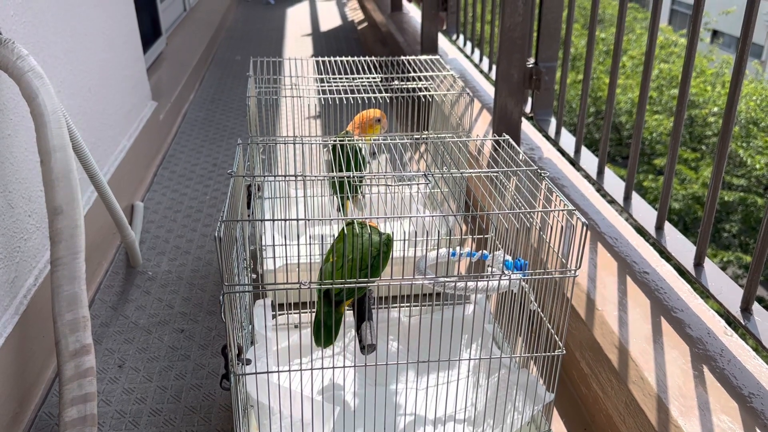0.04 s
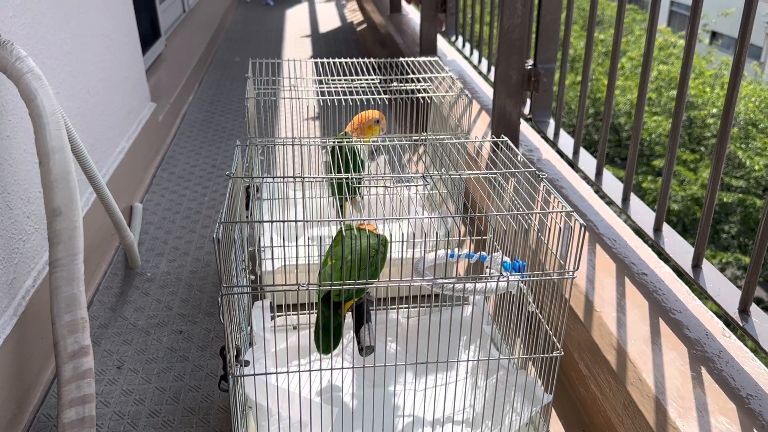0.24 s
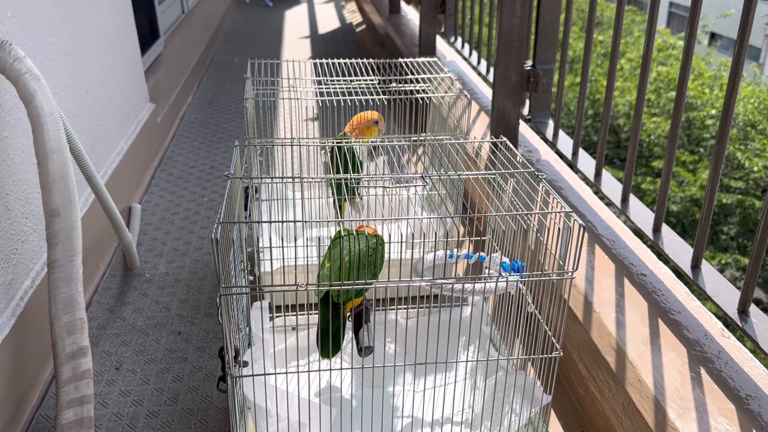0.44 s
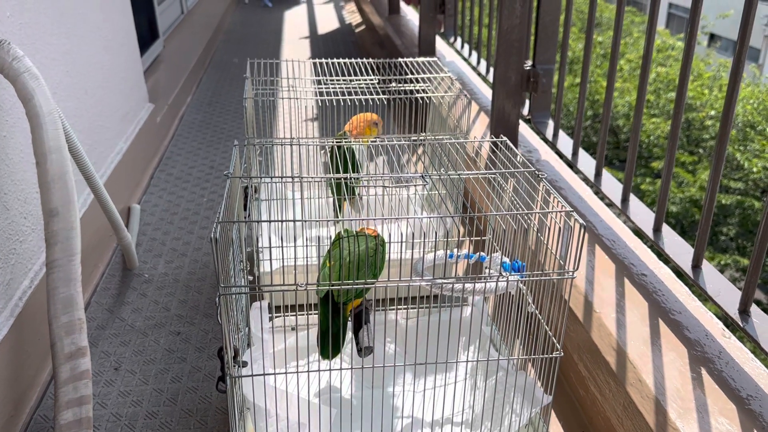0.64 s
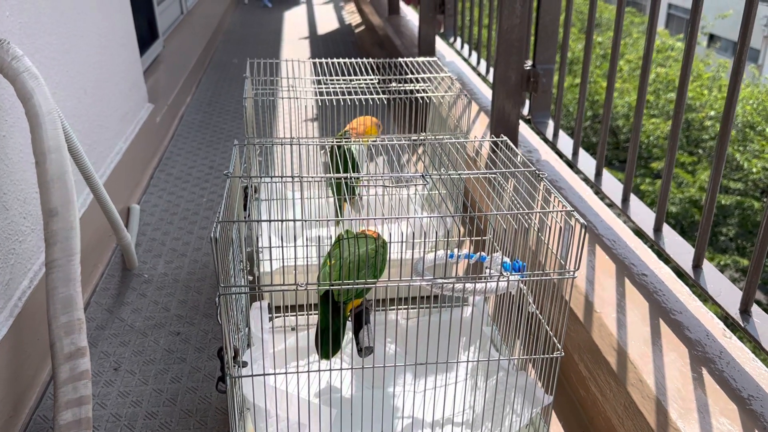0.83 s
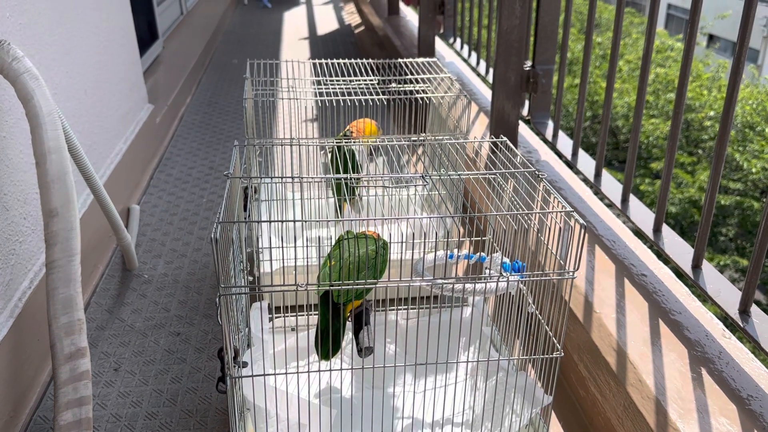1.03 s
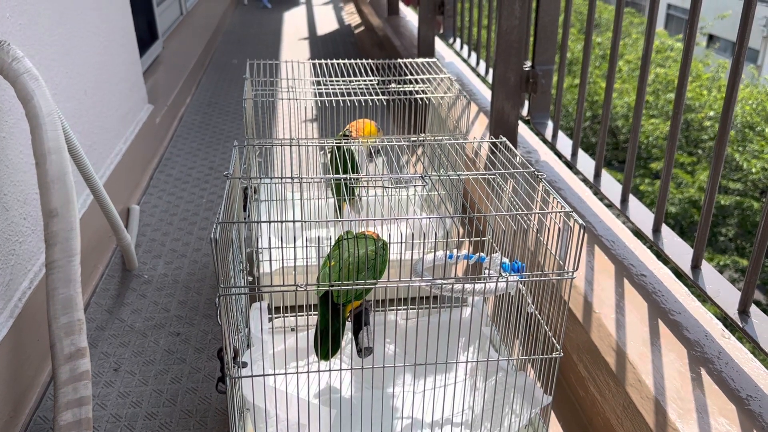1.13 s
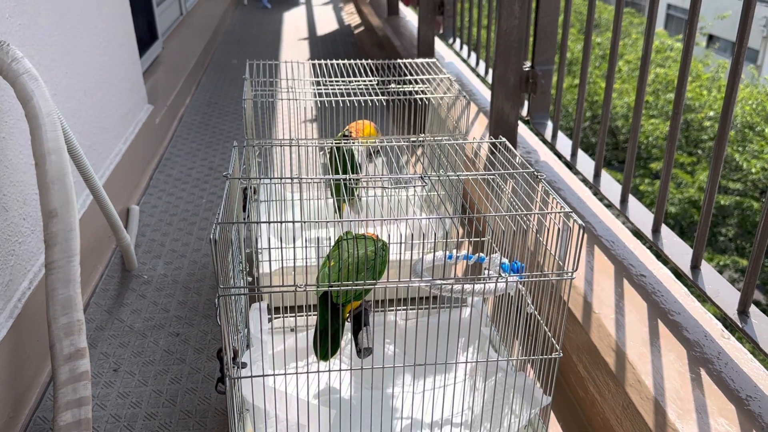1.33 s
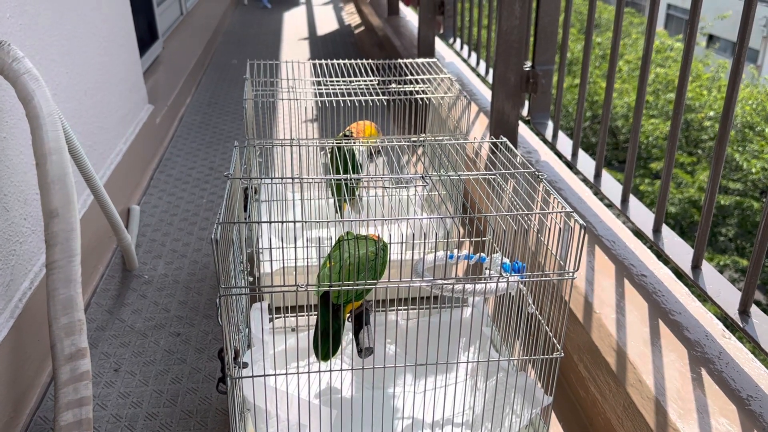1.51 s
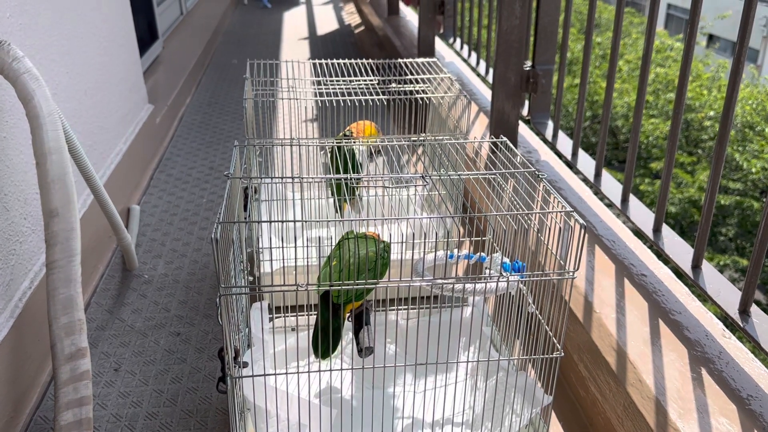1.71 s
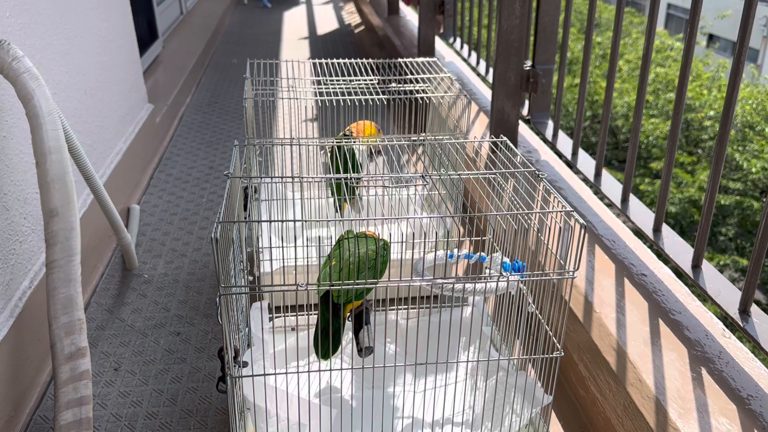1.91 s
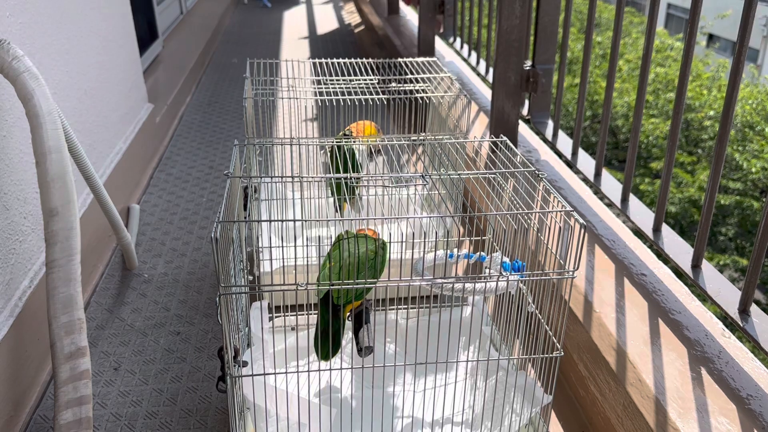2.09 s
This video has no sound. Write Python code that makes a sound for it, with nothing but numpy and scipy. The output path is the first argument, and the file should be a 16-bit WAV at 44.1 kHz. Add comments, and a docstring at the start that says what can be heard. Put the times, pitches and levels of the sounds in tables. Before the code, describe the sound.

A parrot squawks loudly and close by at 0.2 seconds, a harsh fluttering rasp lasting until 0.6. A second squawk at 0.7 clears into a pure whistle that ends around 1 second, echoing lightly off walls and buildings as another bird calls faintly far off. From 1.6 seconds come faint cage ticks, a soft swelling hiss and short distant chirps. A quiet town rumble continues below the balcony throughout.

```python
"""A town rumbles below a balcony, and a cage ticks faintly. At 0.2 s the parrot in it squawks: the
two sides of its syrinx vibrate at different pitches and break into a fluttering rasp, which near walls
and far buildings reflect. A second squawk at 0.7 s clears into a pure whistle, as another bird starts
calling farther off. From 1.6 s come more ticks, a soft swelling hiss and short distant chirps."""
import sys
import numpy as np
from scipy import signal
from scipy.fft import rfft, irfft
from scipy.io import wavfile

SR = 44100
rng = np.random.default_rng(int(sys.argv[2]) if len(sys.argv) > 2 else 0)


def generate_wav(signal):
    """Clip the signal to [-1, 1] and save it as 16-bit WAV at the path in sys.argv[1]."""
    frames = np.transpose(np.atleast_2d(signal))
    scaled = np.clip(frames, -1, 1) * 32767
    pcm = np.round(scaled).astype(np.int16)
    wavfile.write(sys.argv[1], SR, pcm)


N = 94815
T = np.arange(N) / SR
F = np.fft.rfftfreq(N, 1 / SR)

def amp(db):
    """Amplitude ratio from decibels."""
    return 10 ** (np.asarray(db) / 20)

def unit_rms(x):
    """Normalisation to unit power."""
    return x / np.sqrt(np.mean(x ** 2) + 1e-20)

def curve(table, column=1):
    """Linear interpolation over time."""
    rows = np.array(table, float)
    return np.interp(T, rows[:, 0], rows[:, column])

def envelope(table, edge_s=.003):
    """Amplitude envelope, fading to silence outside the table."""
    inside_s = np.minimum(T - table[0][0], table[-1][0] - T)
    return amp(curve(table)) * np.clip(inside_s / edge_s + 1, 0, 1)

def spectrum(table):
    """Interpolation over log frequency."""
    hz, value = np.transpose(table)
    return np.interp(np.log(F + 1), np.log(hz + 1), value)

def colour(x, table):
    """Zero-phase filtering by a gain curve."""
    return irfft(rfft(x) * amp(spectrum(table)), N)

def wander(hz):
    """Low-pass Gaussian noise of unit power."""
    return unit_rms(irfft(rfft(rng.standard_normal(N)) / (1 + (F / hz) ** 4), N))

def noise_band(phase, hz):
    """Random quadrature modulation spreads a tone by about hz to each side."""
    return wander(hz) * np.cos(phase) + wander(hz) * np.sin(phase)

def stereo_noise(table):
    """Partly coherent noise: the channels share half their power."""
    return unit_rms(colour(rng.standard_normal((2, N)) + rng.standard_normal(N), table))

# Rumble spectrum (f/Hz, gain/dB)
TOWN_SPECTRUM = [(15, -48.5), (25, -30.5), (44, -5), (142, -4), (176, -8), (301, -13.5), (383, -13.5),
                 (558, -20), (769, -18), (2700, -38), (3090, -36.5), (3540, -41.5), (7000, -61),
                 (15000, -77.5)]
# Likeness of left and right (f/Hz, correlation)
TOWN_COHERENCE = [(60, 1.0), (180, 0.96), (550, 0.66), (1650, 0.03), (4970, 0.03), (15000, 0.02)]
# Soft low bumps (t/s, f/Hz, level/dB)
BUMPS = [(.65, 57, -39.5), (.81, 68, -41.5)]
def town():
    """Rumble, coherent between the ears at long wavelengths, with two Gaussian tone pulses."""
    common, separate = rfft(rng.standard_normal((2, N)))
    coherence = spectrum(TOWN_COHERENCE)
    right = coherence * common + np.sqrt(1 - coherence ** 2) * separate
    rumble = unit_rms(colour(irfft(np.array([common, right]), N), TOWN_SPECTRUM))
    bumps = sum(amp(db) * np.exp(-((T - s) / .025) ** 2) * np.cos(2 * np.pi * hz * (T - s))
                for s, hz, db in BUMPS)
    return amp(-44.5 + .23 * wander(hz=7.9)) * rumble + np.sqrt(2) * bumps

# Tick onsets (t/s, relative level/dB)
TICKS = [(0.034, -45), (1.631, -61), (1.7641, -53.5), (1.7862, -54.5), (1.91, -69)]
# Tick spectrum (f/Hz, gain/dB)
TICK_SPECTRUM = [(1700, 22), (3000, -10), (4600, 12), (6000, -17), (8300, -9), (12000, -32)]
def cage_ticks(gain_db=8.5, decay_s=.00098):
    """Damped transients: each tick on the cage is noise in exponential decay."""
    decays = sum(amp(db + gain_db) * (T >= s) * np.exp(-abs(T - s) / decay_s) for s, db in TICKS)
    return decays * stereo_noise(TICK_SPECTRUM)

def harmonic(turns, order):
    """One term of a harmonic series; airflow modulates the overtones at random."""
    phase = 2 * np.pi * order * turns
    flicker = .52 if order > 1 else 0
    return np.sqrt(1 - flicker ** 2) * np.sin(phase) + flicker * noise_band(phase, hz=220) / np.sqrt(2)

def syrinx_side(table, roughness, jitter, calm, driven):
    """A vibrating membrane: roughness adds jitter and shimmer and shifts the spectrum to `driven`."""
    pitch_hz = curve(table, 2) * (1 + jitter * roughness * wander(hz=311))
    turns = np.cumsum(pitch_hz) / SR
    drive = np.minimum(2 * roughness, 1)
    wave = sum(amp(calm_db + (driven_db - calm_db) * drive) * harmonic(turns, order)
               for (order, calm_db), (_, driven_db) in zip(calm, driven))
    depth = .34 * roughness
    shimmer = np.exp(depth * np.tanh(wander(hz=428.3)) - depth ** 2 / 2)
    return np.sqrt(2) * wave * envelope(table) * shimmer

# Lower voice in each squawk (t/s, relative level/dB, f/Hz, roughness 0-1)
LOWER_1 = [(.184, -43.5, 1020, 0), (.193, -33.5, 1300, 0.2), (.203, -34.5, 1520, 0.05),
           (.22, -24.5, 1900, 0), (.25, -32.5, 2000, 0.88), (.28, -39, 2560, 0.88), (.3, -24, 2720, 0),
           (.311, -31, 2960, 0.9), (.323, -22.5, 3030, 0.07), (.332, -32.5, 3080, 0.77),
           (.35, -16, 3170, .3), (.37, -33.5, 3230, 0.43), (.4, -39.5, 3220, 0.6), (.42, -28.5, 2481, 1),
           (.445, -35, 2300, 1), (.468, -27.5, 2000, 0.63), (.52, -39, 2377, 1), (.565, -29, 2550, .8),
           (.585, -37.5, 2350, 0.64)]
LOWER_2 = [(0.732, -29, 995, .08), (0.74, -27, 1287, .08), (.744, -21, 1376, .1), (0.75, -27.5, 1636, .15),
           (.753, -28, 1788, .2), (.757, -22.5, 2262, .2), (.768, -19, 2478, .1), (.79, -28, 2432, .7),
           (0.815, -37, 2540, .8), (.839, -53, 2533, 1)]
# Its harmonics (order, gain/dB)
CROAK = [(1, -1.5), (2, -3.5), (3, -9.5), (4, -25.5), (5, -28.5)]
def lower_voice():
    """Frequency glide: one side of the syrinx slides up from a croak."""
    return sum(syrinx_side(table, curve(table, 3), jitter=.063, calm=CROAK, driven=CROAK)
               for table in (LOWER_1, LOWER_2))

# Throat modes (f/Hz, bandwidth/Hz, gain/dB)
THROAT_MODES = [(2046, 120, 13), (2370, 110, 2.1), (3110, 70, 2.7), (3566, 130, 5), (4284, 130, 8.4),
                (4820, 170, 7.4), (6150, 170, 6), (7200, 270, 7), (8194, 240, 8.6)]
def throat(x):
    """Resonance: each narrow mode rings for a few milliseconds."""
    modes = [1 + (amp(db) - 1) / (1 + 2j * (F - hz) / width) for hz, width, db in THROAT_MODES]
    return irfft(rfft(x) * np.prod(modes, axis=0), N)

# Rasp in each squawk (t/s, relative level/dB, extra gain of the low band/dB)
RASP_1 = [(.184, -54.5, 6.5), (.203, -27, -11.5), (.222, -26.5, -2.5), (.275, -38, -5.5),
          (.298, -36.5, -19), (.346, -53.5, -8.5), (.398, -43.5, -10.5), (.418, -31, -16.5),
          (.448, -32, -17), (.47, -30, -2), (.482, -25.5, -13.5), (.55, -27, -2.5), (.59, -50, -1.5)]
RASP_2 = [(.736, -36, -3), (.746, -24, -6), (.756, -34, -4.5), (.766, -37.5, -2.5), (.778, -34, -2.5),
          (.79, -42, -12), (.86, -59, -6.5), (.9, -63.5, 2)]
# Its two bands (f/Hz, gain/dB)
RASP_HIGH = [(300, -46), (1800, -23), (2600, -3.5), (3300, 9.5), (3950, -5), (4400, -2), (5700, -1.5),
             (6600, -7), (7700, -9), (8400, -8), (9200, -18), (10200, -16.5), (11200, -62), (13000, -27.5),
             (14600, -22), (16000, -32)]
RASP_LOW = [(300, -45.5), (800, -15), (1150, -19), (1500, 9), (2000, 0.5), (2400, -24.5), (3000, -8.5),
            (5000, -54.5)]
def rasp(table, snap_hz=910.4):
    """Impulse excitation: chaotic membrane snaps, each with a puff of air, ring the throat."""
    turns = np.cumsum(snap_hz * np.exp(.2 * wander(hz=171))) / SR
    snaps = np.diff(np.floor(turns), prepend=0) * np.exp(.2 * rng.standard_normal(N))
    puffs = np.exp(-(turns % 1) / .4) * rng.standard_normal(N)
    ringing = throat(unit_rms(snaps) + .5 * unit_rms(puffs))
    high = amp(5.5) * unit_rms(colour(ringing, RASP_HIGH))
    low = amp(curve(table, 2) - .5) * unit_rms(colour(ringing, RASP_LOW))
    return envelope(table) * (high + low)

# Syrinx unsteadiness (t/s, upper-voice roughness 0-1, flutter depth 0-1)
UNSTEADINESS = [(.19, .54, .3), (.26, .7, .35), (.29, .7, 0.6), (.39, .7, .25), (.432, .2, .55),
                (.47, .45, .6), (.49, .8, .45), (.55, .9, 0.5), (.735, .3, .15), (.765, .4, 0.2),
                (.8, 1, 0.5), (.835, .25, .05), (.9, .05, 0.05), (.99, .24, 0.09)]
def flutter(lag_turns, rate_hz=96.9, crest_s=.436, squareness=1.5, uneven_db=3):
    """Amplitude modulation: a hard-driven syrinx flips between tone and rasp in each cycle."""
    depth = curve(UNSTEADINESS, 2)
    turns = rate_hz * (T - crest_s) - lag_turns + .12 * wander(rate_hz / 2)
    swing = np.tanh(squareness * np.cos(2 * np.pi * turns)) / np.tanh(squareness)
    strength = amp(uneven_db * depth * np.tanh(wander(rate_hz)))
    return strength * (1 + depth * swing) / np.sqrt(1 + depth ** 2 / 2)

# Upper voice in each squawk (t/s, relative level/dB, f/Hz)
UPPER_1 = [(.2, -36, 3452), (.219, -13.5, 3500), (.237, -26, 3500), (.255, -28.5, 3480), (.264, -34, 3168),
           (.277, -21.5, 3116), (.308, -27.5, 3130), (.316, -21, 3475), (.331, -9, 3512), (.342, -27, 3612),
           (.357, -18.5, 3465), (.369, -30.5, 3540), (.39, -17.5, 3560), (.406, -26, 3550),
           (.429, -27, 3530), (.435, -8, 3564), (.444, -28, 3600), (.454, -11.5, 3575), (.468, -13, 3565),
           (.49, -20, 3506), (.522, -17.5, 3466), (.531, -21, 3130), (.552, -17, 3065), (.56, -30, 3036),
           (.575, -46.5, 3100)]
UPPER_2 = [(0.732, -26.5, 3137), (.741, -25.5, 3080), (.747, -15, 3143), (.754, -31.5, 3226),
           (0.771, -42.5, 3163), (.775, -12.5, 3196), (0.807, -23.5, 3121), (0.823, -25, 3155),
           (.835, -17.5, 3050), (.868, -18, 3076), (0.875, -32.5, 3065), (.882, -14.5, 3013),
           (0.902, -10.5, 3108), (0.931, -13, 3059), (.948, -16, 3025), (.957, -26, 2935),
           (.988, -22, 2953), (1.005, -34.5, 2940)]
# Its harmonics, calm and driven (order, gain/dB)
PURE = [(1, 0), (2, -20), (3, -33), (4, -30), (5, -39)]
HARSH = [(1, 2), (2, -11), (3, -18.5), (4, -19), (5, -32)]
def upper_voice():
    """Harmonic vibration of the other side, nearly sinusoidal once its roughness subsides."""
    return sum(syrinx_side(table, curve(UNSTEADINESS), jitter=.015, calm=PURE, driven=HARSH)
               for table in (UPPER_1, UPPER_2))

# Beak response (f/Hz, gain/dB)
BEAK = [(500, -13.5), (1000, -11), (1900, -3.5), (3000, 2.5), (3550, -1), (3950, -11.5), (4800, -0.5),
        (8400, -5), (9600, -12), (11200, -43), (12300, -30), (14200, -13.5), (15000, -6.5), (16000, -11)]
def parrot():
    """Source and filter: two voices pass the beak, and the rasp bursts between the upper one's throbs."""
    voices = amp(-3.5) * upper_voice() * flutter(lag_turns=0) + amp(1.5) * lower_voice()
    rasps = (rasp(RASP_1) + rasp(RASP_2)) * flutter(lag_turns=.32)
    return colour(voices, BEAK) + rasps + whistle_air()

# Level difference of the ports (f/Hz, left minus right/dB)
PORT_BALANCE = [(60, 2), (99, 7), (160, 0), (270, -3), (450, -1), (740, -1.5), (1220, 2), (2010, 4),
                (3330, 4), (5500, 11.5), (9080, 5), (15000, 3.5)]
# Their phase difference (f/Hz, lead of left/rad)
PORT_PHASE = [(0, -24), (1640, 2.5), (2240, 0.62), (3960, 1.26), (4740, 1.91), (5680, -12), (6370, -9.5),
              (6980, -17), (10400, -21.5), (13200, -28.5), (15700, -39)]
# Turning of the head (t/s, left minus right/dB)
HEAD_TURN = [(.2, -2), (.48, -2.5), (.56, -4.5), (.8, -3.5), (1., -5.5)]
def direct_path(x):
    """Directivity: the head turns, and each microphone port colours and delays the bird differently."""
    sides = np.array([[.5], [-.5]])
    response = amp(sides * spectrum(PORT_BALANCE)) * np.exp(1j * sides * spectrum(PORT_PHASE))
    return irfft(rfft(x) * response, N) * amp(sides * curve(HEAD_TURN))

def delayed(x, s):
    """Propagation delay."""
    return np.pad(x, (int(s * SR), 0))[:N]

def reverb(x, t60, rise_s=.0041):
    """Diffuse field: convolution with decaying noise, different at each ear."""
    response = rng.standard_normal((2, N)) * amp(-60 * T / t60) * np.minimum(T / rise_s, 1)
    return signal.fftconvolve(x[None], response / np.linalg.norm(response[0]), axes=1)[:, :N]

# Near walls (delay/s, left gain/dB, right gain/dB)
WALLS = [(.0017, -31.5, -37), (.0036, -20.5, -19), (.0083, -24.5, -22), (0.014, -22, -17)]
# Colour of the balcony's ring and of the path across the yard (f/Hz, gain/dB)
BALCONY_COLOUR = [(2450, 1.5), (3050, -3.5), (3550, -1), (4400, -2), (6200, 4), (14000, -5.5)]
YARD_COLOUR = [(1000, 2), (3080, -5), (3400, -13), (3650, -17), (4500, 0), (6200, -6), (8000, -7),
               (10000, -19), (14000, -39.5)]
# Far buildings (delay/s, gain/dB)
BUILDINGS = [(.215, -32.5), (.4, -49.5), (.55, -47.5)]
def reflections(x):
    """Reflection: near walls answer first, then a short ring and dull echoes from across the yard."""
    walls = sum(amp([[left], [right]]) * delayed(x, s) for s, left, right in WALLS)
    ring = amp(-6) * reverb(colour(x, BALCONY_COLOUR), t60=.16)
    dull = colour(x, YARD_COLOUR)
    yard = amp(-22.5) * reverb(dull, t60=.86)
    echoes = sum(amp(db) * delayed(dull, s) for s, db in BUILDINGS)
    return walls + ring + yard + reverb(echoes, t60=.04)

# Air hiss (t/s, level/dB)
AIR_LEVEL = [(.86, -61.5), (.877, -46.5), (.905, -65), (.94, -56.5), (.985, -58.5), (1.005, -59.5)]
# Its spectrum (f/Hz, gain/dB)
AIR_SPECTRUM = [(2700, -9), (3600, -29), (4050, -21.5), (4350, 8.5), (5300, -14.5), (6000, -4),
                (7200, -27.5), (8800, -13), (11000, -35.5)]
def whistle_air():
    """Flow noise: a little air hisses around the whistle."""
    return envelope(AIR_LEVEL) * unit_rms(colour(rng.standard_normal(N), AIR_SPECTRUM))

# Distant notes (t/s, duration/s, start f/Hz, end f/Hz, relative level/dB, bandwidth/Hz)
FAR_CALLS = [(0.879, 0.34, 1337, 1264, -55, 340), (1.822, 0.035, 4660, 3810, -57, 1000),
             (1.839, 0.055, 3525, 2455, -62.5, 600), (1.912, 0.072, 6600, 6100, -65, 352),
             (1.958, 0.06, 4860, 4170, -59.5, 900), (1.998, 0.041, 3960, 3780, -55.5, 600),
             (2.042, 0.054, 3470, 3900, -55, 900), (2.113, 0.041, 3130, 3140, -51, 130)]
def far_birds():
    """Narrow-band noise glides make hoarse, mostly falling notes, blurred by reflection."""
    calls = np.zeros(N)
    for s, length, from_hz, to_hz, db, width in FAR_CALLS:
        progress = np.clip((T - s) / length, 0, 1)
        phase = 2 * np.pi * np.cumsum(from_hz + (to_hz - from_hz) * progress) / SR
        arch = np.sqrt(abs(np.sin(np.pi * progress)))
        calls += amp(db) * arch * noise_band(phase, width / 2)
    return .8 * calls + .6 * reverb(calls, t60=.2)

# Closing hiss (t/s, level/dB)
HISS_LEVEL = [(1.7, -92.5), (1.8, -74.5), (1.9, -68.5), (1.98, -61.5), (2.06, -53.5), (2.11, -56.5),
              (2.15, -58.5)]
# Its spectrum (f/Hz, gain/dB)
HISS_SPECTRUM = [(1000, -25), (2500, 16.5), (4000, 18.5), (5500, 9), (8500, -3), (10000, -15.5),
                 (14000, -44)]
def soft_hiss():
    """Band-pass noise swells under a slow envelope."""
    return envelope(HISS_LEVEL) * stereo_noise(HISS_SPECTRUM)

def scene():
    """Superposition of the parrot, its reflections and the background."""
    squawks = parrot()
    return town() + cage_ticks() + direct_path(squawks) + reflections(squawks) + far_birds() + soft_hiss()

def record(dry, cutoff_hz=15900):
    """Band limiting by a linear-phase low-pass filter."""
    lowpass = signal.firwin(511, cutoff_hz, window=("kaiser", 9), fs=SR)
    return signal.oaconvolve(dry, lowpass[None], "same")

dry = scene()
out = record(dry)
generate_wav(out)
```